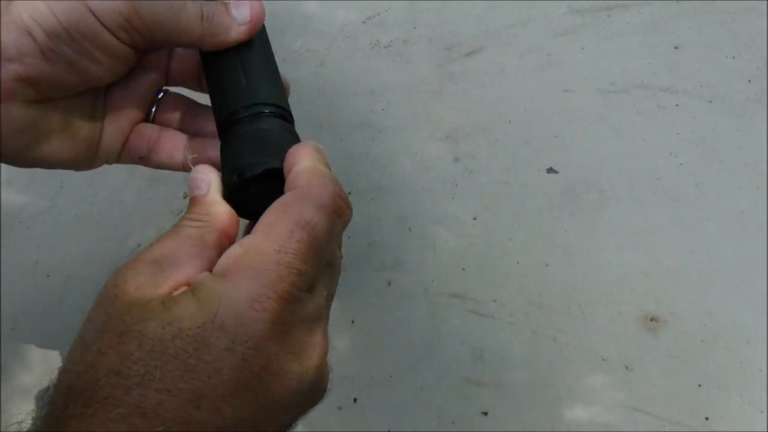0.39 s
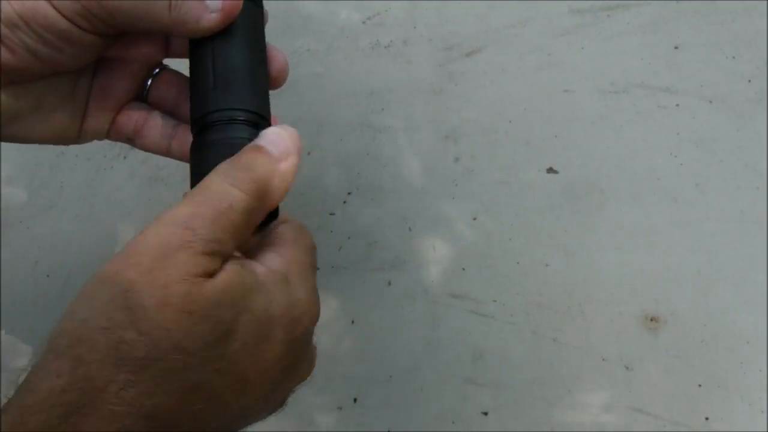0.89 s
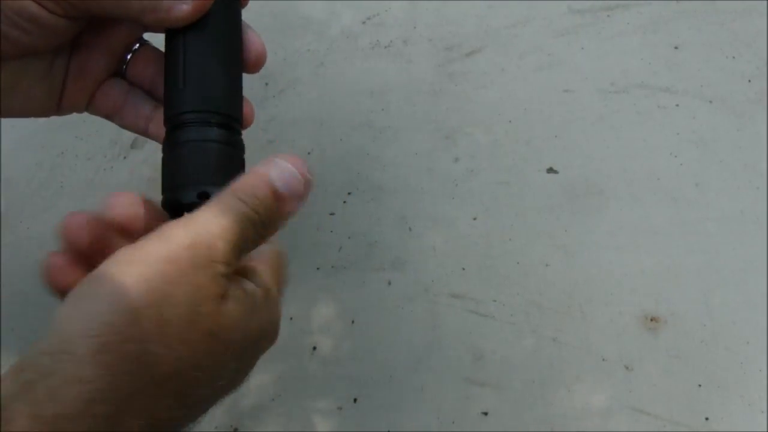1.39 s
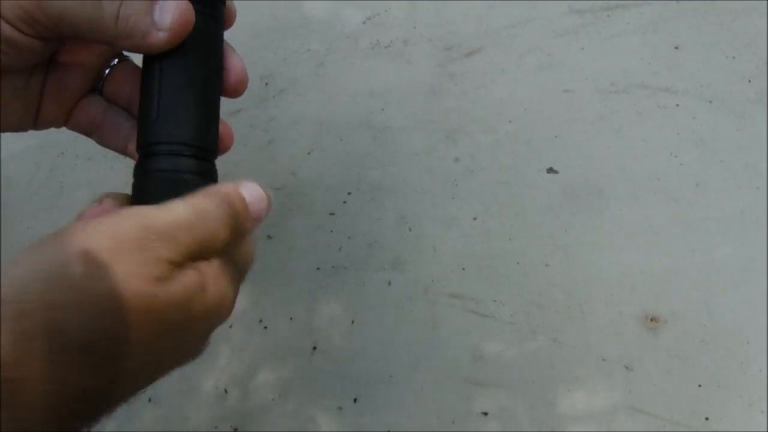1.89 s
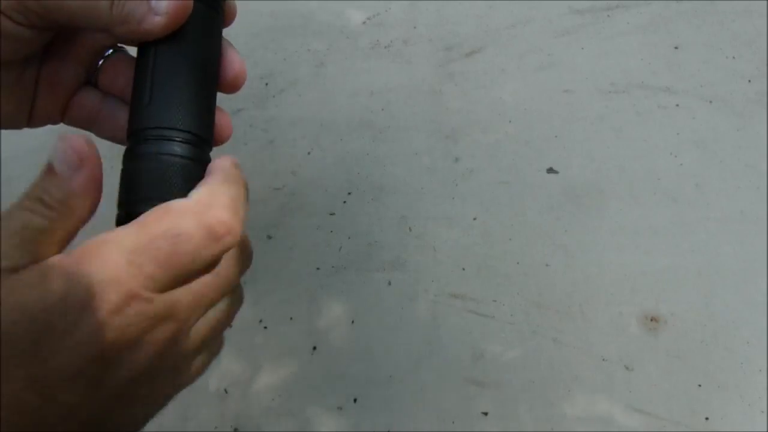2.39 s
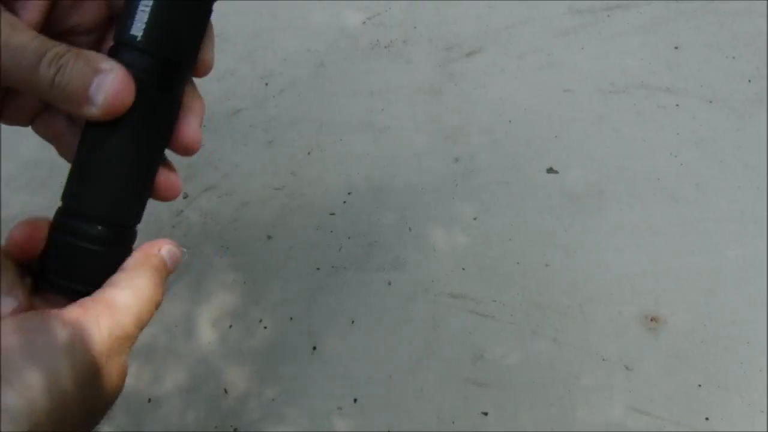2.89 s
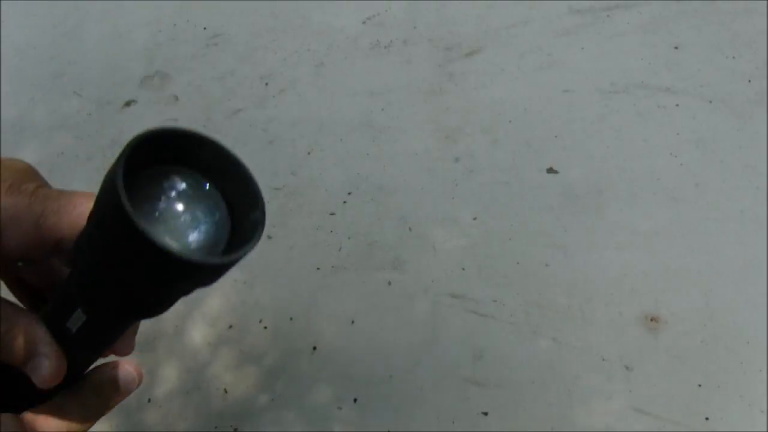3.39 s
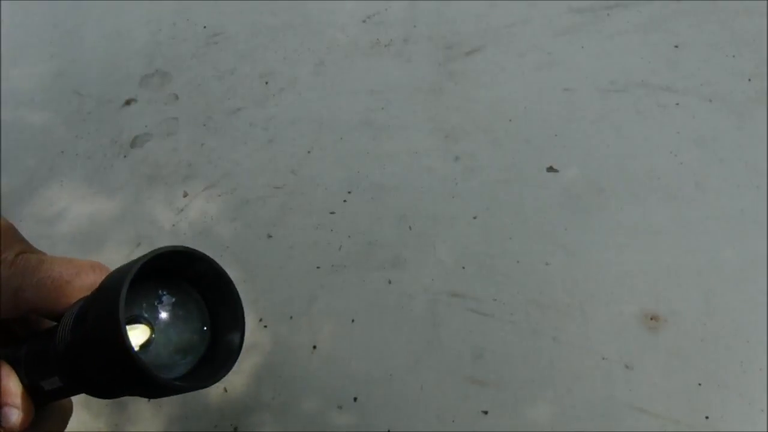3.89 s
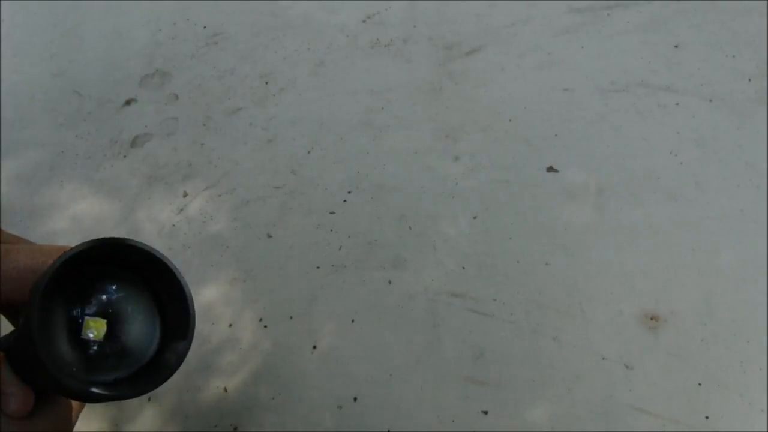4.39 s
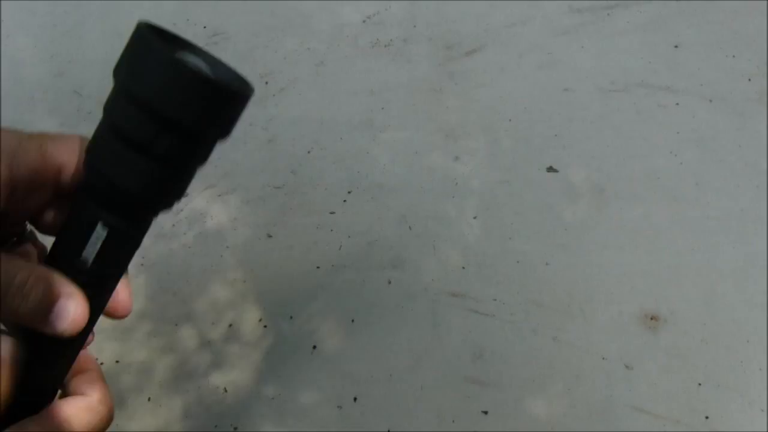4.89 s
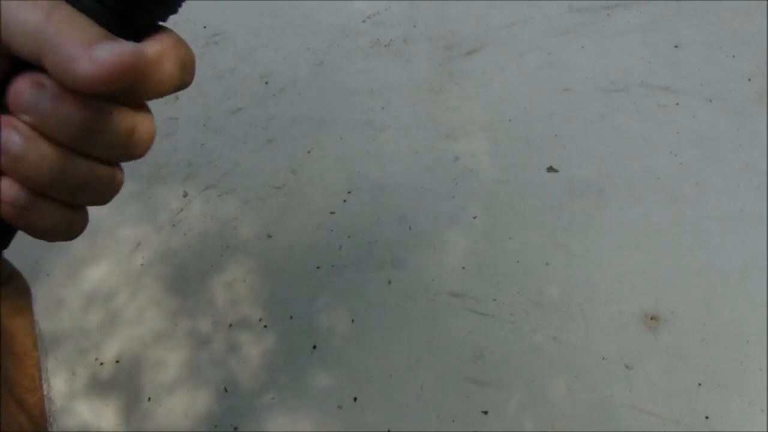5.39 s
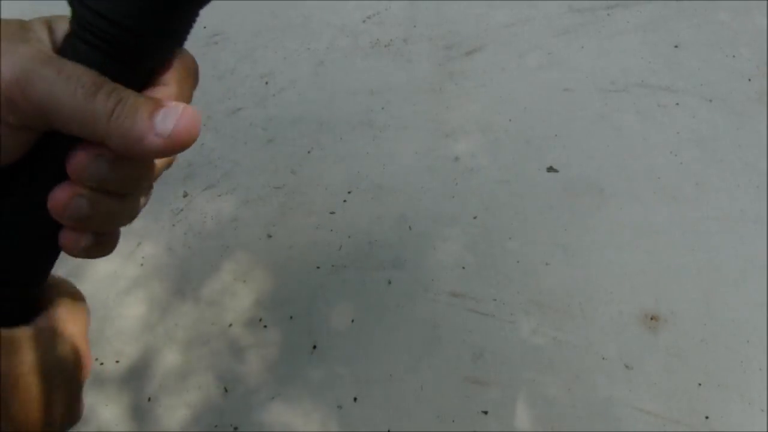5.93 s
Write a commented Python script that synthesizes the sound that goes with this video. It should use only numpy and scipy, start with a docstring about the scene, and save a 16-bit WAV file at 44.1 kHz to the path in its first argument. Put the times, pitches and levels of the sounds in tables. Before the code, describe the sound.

A close microphone catches thin metallic scrapes and ticks, then a startling snap as a flashlight cap drops onto its thread. Brief rough rubs repeat about three times a second as it is twisted tight. After a lull, the push switch snaps four times; dry skin and grip rustles end it. The open-air background is soft and steady: distant traffic, cicadas, fine hiss, fast high insect trill. Only tiny short echoes.

```python
"""Screwing the cap onto a flashlight

Outdoors, hands screw the end cap onto a metal flashlight in short twists: tiny slips ring the tube and rub.
The loose cap snaps onto its thread once; later the push switch clicks and the grip is wrung tight.
Behind: traffic rumble, a cicada drone and hiss, all shaped noise, and a katydid's whistled trill."""
import sys
import numpy as np
from scipy import signal
from scipy.fft import rfft, irfft
from scipy.io import wavfile

SR = 44100
rng = np.random.default_rng(int(sys.argv[2]) if len(sys.argv) > 2 else 0)


def dump_mix(stems):
    """Bounce the given channels to the path in sys.argv[1] as a 16-bit WAV at rate SR."""
    frames = np.atleast_2d(stems).T  # one column per channel
    limited = np.clip(frames, -1, 1)  # hard clip at full scale
    pcm = np.round(limited * 32767).astype(np.int16)
    wavfile.write(sys.argv[1], SR, pcm)


def voltage_ratio(level):
    """Linear amplitude factor for a level in decibels (scalar or array-like)."""
    return 10 ** (np.asarray(level, float) / 20)


N = 266319  # samples

# ringing tones of tube and cap, before the hold changes them: pitch_hz, width_hz, level_db
TUBE_MODES = [(1153, 460, -11.5), (2308, 590, -2.5), (2908, 1060, -13), (3710, 480, -1.5), (4550, 600, 1),
              (5390, 350, 2), (6100, 1130, -2.5), (7340, 420, 3.5), (8017, 270, -1), (8960, 600, -19),
              (11220, 1020, -15), (13600, 700, -45), (15500, 690, -9)]
# metal contacts: start_s, peak_db, low_modes_db, middle_modes_db
CONTACTS = [(0.0276, -33, 8, 10), (0.1523, -31, 16, -6), (0.4417, -24, -5, 9), (0.488, -22.5, 14, -2),
            (0.615, 4, 0, -14.5), (0.6157, 2.5, -1, 9.5), (0.6579, -31.5, 12, -2), (0.9873, -26, -4, 2),
            (1.2516, -39, 2, 3), (1.6504, -26, 25, 0), (1.9592, -27.5, 0, 1), (5.3182, -31, 16, 6),
            (5.5054, -40, 7, -9), (5.7838, -30, -2, -5), (5.825, -33, 12, -2)]


def evened(x):
    """Scales x to an average (rms) level of 1."""
    return x / np.sqrt(np.mean(x ** 2) + 1e-20)


def read(points, hz):
    """Reads a curve of (Hz, value) points along a logarithmic pitch axis."""
    f, value = np.transpose(points)
    return np.interp(np.log(hz + 1), np.log(f + 1), value)


def coloured(x, spectrum):
    """Filters x by the curve (Hz, dB), then evens its level."""
    gain = voltage_ratio(read(spectrum, np.fft.rfftfreq(len(x), 1 / SR)))
    return evened(irfft(rfft(x) * gain, len(x)))


def wander(rate_hz):
    """Slow chance: random values rate_hz times a second, joined by lines."""
    values = rng.standard_normal(size=8000)
    return np.interp(np.arange(N) / SR * rate_hz, np.arange(len(values)), values)


def resonate(x, hz, width_hz):
    """A resonance of gain 1 at a moving pitch: shifts hz down to zero, smooths, and shifts back."""
    turn = np.exp(2j * np.pi * np.cumsum(hz * np.ones(len(x))) / SR)
    r = np.exp(-np.pi * width_hz / SR)
    smooth = signal.lfilter([1 - r], [1, -r], x / turn)
    return 2 * (turn * smooth).real


def grip(hz, low_db, middle_db, top_db):
    """How the hold lifts or damps the low, middle and top of the spectrum."""
    # points: Hz, share of the band's dB that applies there
    low = read([(2700, 0.58), (3300, 0.0066)], hz)
    middle = read([(2700, 0.0055), (3300, 0.93), (4500, 0.98), (5300, 0.014)], hz)
    top = read([(8500, 0.044), (11000, 0.96)], hz)
    return voltage_ratio(low * low_db + middle * middle_db + top * top_db)


def ring(x, modes, gains, narrow=1):
    """Metal rings in modes, each a double pole that swells before it dies; narrow scales their widths."""
    out = np.zeros(len(x))
    for k, ((hz, width_hz, db), gain) in enumerate(zip(modes, gains)):
        r = np.exp(-np.pi * narrow * width_hz / SR)
        pole = r * np.exp(2j * np.pi * hz / SR)
        tone = signal.lfilter([(1 - r) ** 2], [1, -2 * pole, pole ** 2], x).real
        out += (-1) ** k * voltage_ratio(db) * gain * tone  # neighbours have opposite signs
    return out


def background():
    """Noise filtered into rumble that swells, a smooth far drone of many cicadas, and leaf and microphone hiss."""
    # traffic rumble: pitch_hz, relative level_db per Hz
    rumble_curve = [(14, -18), (22, 0), (45, -3), (60, 1.5), (78, -9), (100, -14.5), (125, -11.5),
                    (180, -15.5), (250, -19), (500, -24), (1050, -28), (1500, -60)]
    # cicada drone: pitch_hz, relative level_db per Hz
    drone_curve = [(620, -38), (1050, -19), (1110, -18), (1270, -3), (1460, -0.5), (1540, -4.5),
                   (1630, -7.5), (1790, -13.5), (1950, -21.5), (2540, -34), (4290, -120)]
    # drone level over time: time_s, level_db
    drone_levels = [(0.0, -52), (0.79, -54), (1.24, -51.5), (1.75, -54), (3.2, -53), (6.04, -53)]
    # hiss: pitch_hz, relative level_db per Hz
    hiss_curve = [(600, -12), (1500, -6.5), (2200, 1.5), (5000, 2.5), (7500, -1), (11000, -6), (16000, -8)]
    rumble, drone, hiss = rng.standard_normal((3, N))
    rumble_db = -51 + 0.32 * wander(1.5)
    drone_db = np.interp(np.arange(N) / SR, *np.transpose(drone_levels))
    hiss_db = -60 + 0.53 * wander(7.7)
    return (voltage_ratio(rumble_db) * coloured(rumble, rumble_curve) + voltage_ratio(drone_db) * coloured(drone, drone_curve)
            + voltage_ratio(hiss_db) * coloured(hiss, hiss_curve))


def katydid():
    """Each wing stroke is a thin whistle that arches up and falls."""
    # pace of the trill: time_s, wing strokes done by then
    stroke_count = [(0, .6), (.4, 26.33), (3.6, 231.17), (5.4, 346.43), (6.04, 387.52)]
    # one wing stroke: part of the stroke (0-1), pitch_hz, level_db
    wing_stroke = [(.17, 9200, -85), (.24, 9300, -62), (.37, 9560, -61), (.52, 9700, -63), (.66, 9500, -63),
                   (.8, 8950, -64), (.88, 8600, -85)]
    # added to the stroke's level over time: time_s, change_db
    trill_levels = [(0, -4), (3, -1.5), (6.04, -1)]
    t = np.arange(N) / SR
    part, hz, db = np.transpose(wing_stroke)
    phase = np.interp(t, *np.transpose(stroke_count)) % 1
    pitch_hz = np.interp(phase, part, hz) + 40 * wander(305)
    level_db = np.interp(phase, part, db) + np.interp(t, *np.transpose(trill_levels)) + 1.4 * wander(60)
    return np.sqrt(2) * voltage_ratio(level_db) * np.sin(2 * np.pi * np.cumsum(pitch_hz) / SR)


def clicks(events, modes, ms):
    """Each click is one firm contact amid ms of light chatter, ringing the modes."""
    out = np.zeros(N)
    luck = rng.random((len(events), 2, 6))  # six light hits a click: when and how strong
    for (start_s, peak_db, *hold_db), (part, size) in zip(events, luck):
        hits = np.zeros(2000)
        np.add.at(hits, (part * ms * SR / 1000).astype(int), .25 * (2 * size - 1))
        hits[round(.35 * ms * SR / 1000)] += 1  # the firm contact
        sound = ring(hits, modes, [grip(hz, *hold_db) for hz, _, _ in modes])
        start = round(start_s * SR)
        out[start:start + 2000] += voltage_ratio(peak_db) * sound / abs(sound).max()
    return out


def switch_snaps():
    """The push switch snaps: brief contacts ring its dome in the cap."""
    # switch dome in its cap: pitch_hz, width_hz, level_db before the hold changes it
    dome_modes = [(1520, 1170, -10.5), (2570, 740, -1), (3426, 620, 2.5), (4450, 1200, -1), (5640, 680, -2),
                  (7160, 860, -1.5), (7980, 540, -3.5), (9100, 1400, -11), (11800, 910, -34),
                  (13100, 850, -23), (14400, 800, -32)]
    # switch snaps: start_s, peak_db, low_modes_db, middle_modes_db, top_modes_db
    snaps = [(3.7148, -8, -12, 4, -10.5), (3.9197, -12, -11, -0.5, 2), (4.5943, -15, 10.5, -8, 11),
             (4.8106, -14.5, 1.5, -8, 0)]
    return clicks(snaps, dome_modes, ms=1.9)


def cap_contacts():
    """Metal touches metal: brief contacts ring the tube and cap."""
    top_modes_db = -9
    return clicks([(*row, top_modes_db) for row in CONTACTS], TUBE_MODES, ms=1.6)


def knock():
    """The cap drops home with a dull knock at the hardest contact: a short low ring of the whole body."""
    peak_db, pitch_hz, t60_s = -28, 430, .01  # t60: time to fall by 60 dB
    hardest = max(CONTACTS, key=lambda row: row[1])
    t = np.maximum(np.arange(N) / SR - hardest[0] + .0008, 0)  # sine of zero: silent until then
    return voltage_ratio(peak_db - 60 * t / t60_s) * np.sin(2 * np.pi * pitch_hz * t)


def stroke(now, start, peak, end, peak_db, shape):
    """Power of one hand stroke: it catches and swells, then lets go, in some strokes before reaching its peak."""
    catch, start_db, end_db, let_go = shape
    db = np.interp(now, [start, peak, end], [start_db, 0, end_db])
    db = db - catch * np.maximum(start - now, 0) - let_go * np.maximum(now - end, 0)
    return voltage_ratio(2 * np.maximum(peak_db + db, -140))  # doubled dB give power


def hands():
    """Level, hollow of the hand and hold over time: the strongest stroke has the say."""
    # fingers hunt for the thread with the cap: start_s, peak_s, end_s, peak_db, hollow_hz (hollow of the hand)
    fumbles = [(-.01, 0, 0.0048, -40, 5500), (0.109, .17, 0.23, -46, 7300), (.23, .25, 0.29, -60, 5000),
               (0.434, 0.463, .5, -39, 7000), (0.561, 0.592, 0.6, -40.5, 7350),
               (0.609, .63, 0.66, -43.5, 6000), (.68, .705, 0.72, -45.5, 5000),
               (.73, .77, 0.804, -38.5, 4600), (0.792, 0.807, 0.857, -32, 6100),
               (0.888, .95, 1.02, -39, 5230), (0.996, 1.04, 1.102, -42, 6000)]
    # the tilted cap grinds on its rim: start_s, peak_s (here past end_s), end_s, peak_db, hollow_hz
    grind = (.495, 0.8, 0.59, -47, 2250)
    # turns of the cap: start_s, peak_s, end_s, peak_db, back_db (peak as the fingers slide back)
    twists = [(1.342, 1.372, 1.467, -35.5, -64), (1.653, 1.68, 1.765, -39.5, -69),
              (1.956, 1.996, 2.077, -39.5, -66), (2.264, 2.296, 2.385, -43, -59.5),
              (2.577, 2.656, 2.71, -41.5, -59), (2.903, 2.97, 3.036, -46.5, -62)]
    # palms shift and wring the grip, twice letting go before the peak: start_s, peak_s, end_s, peak_db, hollow_hz
    wrings = [(4.88, 4.98, 5.2, -59.5, 6800), (5.077, 5.102, 5.14, -56.5, 6800),
              (5.268, 5.29, 5.2, -56, 7000), (5.33, 5.429, 5.47, -43.5, 6000),
              (5.545, 5.577, 5.65, -52.5, 6400), (5.622, 5.64, 5.6, -58, 6400),
              (5.746, 5.791, 5.83, -35, 6830), (5.83, 5.851, 5.9, -45, 5560), (5.95, 5.99, 6.04, -48, 6500)]
    # stroke shapes: catch dB per s, start and end dB relative to the peak, let go dB per s
    fumbling, turning, wringing = (898, -6, -5.5, 800), (2000, -4, -5.5, 1300), (600, -10.5, -9, 599)
    # holds: low, middle and top dB, share of ringing metal (later clipped to 0-1), hollow dB
    loose, tilted, seated = (5, 1, -2, .8, -4), (16, -1, -5, .8, 6), (-4, -1, -7, .4, 2)
    first_turn, last_turn = (3, -1.5, -1.5, .12, -2), (3.5, -1.5, 2.5, -0.5, -4)
    sliding, wrung = (3, 1, -10, 0, -4), (-24, -5, -7, 0, 2)
    seated_s = .62  # fumbles that peak from here on have the cap on its thread
    first_turn_hz, last_turn_hz = 5670, 6700  # the hand closes as the cap tightens
    back_after_s, back_s, back_hz = 0.046, .1, 5200  # sliding back: rise, fall, hollow
    top_loss, hollow_loss = .5, .3  # dB lost for each dB the stroke is under its peak

    moves = [(row, fumbling, loose if row[1] < seated_s else seated) for row in fumbles]
    moves += [(grind, fumbling, tilted)]
    moves += [(row, wringing, wrung) for row in wrings]
    for (start, peak, end, peak_db, back_db), tight in zip(twists, np.linspace(0, 1, len(twists))):
        hz = first_turn_hz + tight * (last_turn_hz - first_turn_hz)
        hold = np.add(first_turn, tight * np.subtract(last_turn, first_turn))
        back_peak = end + back_after_s
        moves += [((start, peak, end, peak_db, hz), turning, hold),
                  ((end, back_peak, back_peak + back_s, back_db, back_hz), wringing, sliding)]

    steps = np.arange(0, N / SR + .002, .001)
    power = np.array([stroke(steps, *row[:4], shape) for row, shape, _ in moves])
    total = power.sum(axis=0)
    settings = np.array([(*row[3:], *hold) for row, _, hold in moves])
    # average of the settings, weighted by power
    peak_db, hz, low_db, middle_db, top_db, metal, hollow_db = settings.T @ power / total
    slack_db = np.clip(10 * np.log10(total) - peak_db, -20, 0)
    top_db = top_db + top_loss * slack_db
    hollow_db = hollow_db + hollow_loss * slack_db
    curves = np.sqrt(total), hz, low_db, middle_db, top_db, metal, hollow_db
    return [np.interp(np.arange(N) / SR, steps, c) for c in curves]


def twisting():
    """Dense micro-slips of thread and skin: part rings the tube, part is a dry rub in the cupped hand."""
    # palm sliding on knurling: pitch_hz, relative level_db per Hz
    skin_curve = [(1300, -39), (1900, -8.5), (2400, -4.5), (3500, -7), (4500, -1), (6000, -1), (8500, -3),
                  (10200, -11), (12000, -10.5), (15700, -17)]
    level, hollow_hz, *hold_db, metal, hollow_db = hands()

    # about 9000 slips a second, of random size and sign
    size = voltage_ratio(2.0 * np.minimum(rng.exponential(1, N), 5))
    slips = size * rng.choice([-1, 1], N) * (rng.random(N) < 9000 / SR)

    # the hold filters the rub frame by frame
    hz, t, z = signal.stft(coloured(slips, skin_curve), SR, nperseg=256)
    at = np.minimum((t * SR).astype(int), N - 1)
    held = z * grip(hz[:, None], *(c[at] for c in hold_db))
    rub = signal.istft(held, SR, nperseg=256)[1][:N]

    # the contact point creeps round the thread, so each mode comes and goes
    gains = [grip(hz, *hold_db) * voltage_ratio(3.0 * wander(25)) for hz, _, _ in TUBE_MODES]
    ringing = evened(ring(slips, TUBE_MODES, gains, narrow=0.95))

    metal = np.clip(metal, 0, 1)
    sound = np.sqrt(metal) * ringing + np.sqrt(1 - metal) * rub
    sound += voltage_ratio(hollow_db) * resonate(sound, hollow_hz, 1450)
    clumps_db = 2.04 * wander(300) + 0.97 * wander(60)  # slips come in clumps
    return level * voltage_ratio(clumps_db) * evened(sound)


def ground(x):
    """Scattered short echoes from hands, body and paving: a fading burst of noise as echo pattern."""
    t = np.arange(SR // 10) / SR
    # starts after 2.2 ms, falls 60 dB in 28 ms
    tail = rng.standard_normal(len(t)) * voltage_ratio(-60 * t / 0.028) * (t > .0022)
    return x + voltage_ratio(-18.5) * signal.oaconvolve(x, tail / np.linalg.norm(tail))[:N]


def scene():
    """Flashlight near, with echoes; insects and traffic far."""
    near = twisting() + knock() + cap_contacts() + switch_snaps()
    return (ground(near) + katydid() + background())[None]


def band_limit(x):
    """A steep low-pass at the top of the band."""
    return signal.sosfilt(signal.butter(12, 17250, fs=SR, output="sos"), x)


def record(dry):
    """Cuts the treble above an edge and clips the loudest snap at full scale."""
    edge_hz = 15790
    edge = signal.firwin(2047, edge_hz, window=("kaiser", 9), fs=SR)
    band = signal.oaconvolve(dry, edge[None], "same")
    return band_limit(np.clip(band, -1, 1))


dry = scene()
out = record(dry)
dump_mix(out)
```